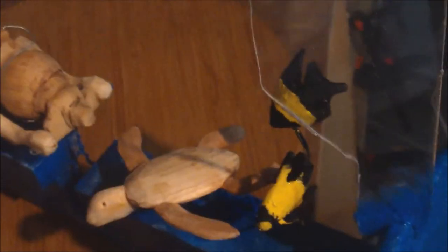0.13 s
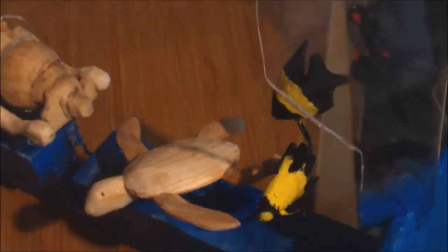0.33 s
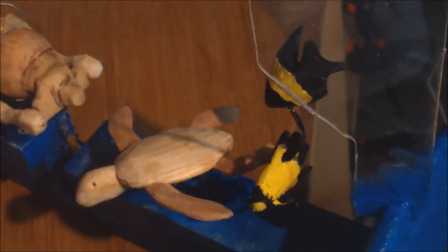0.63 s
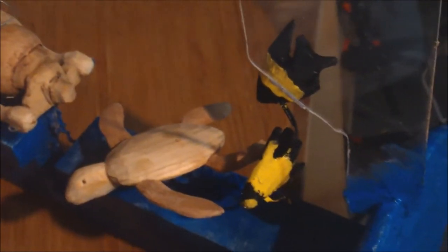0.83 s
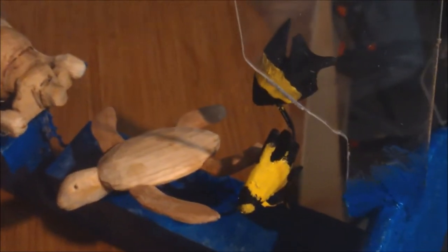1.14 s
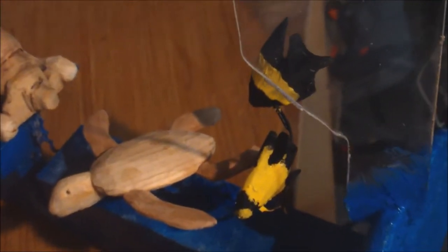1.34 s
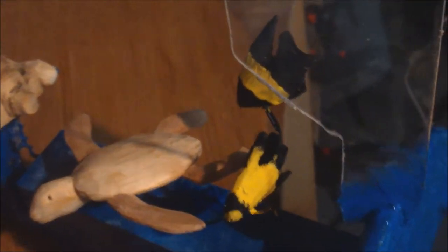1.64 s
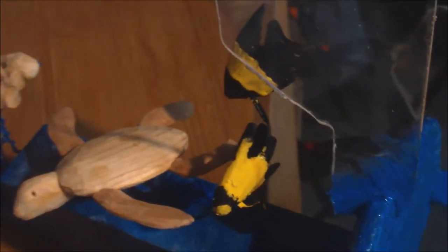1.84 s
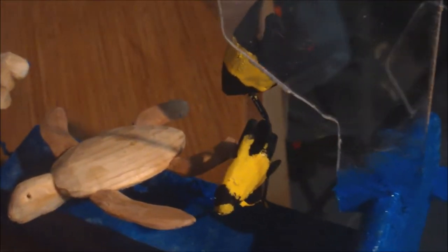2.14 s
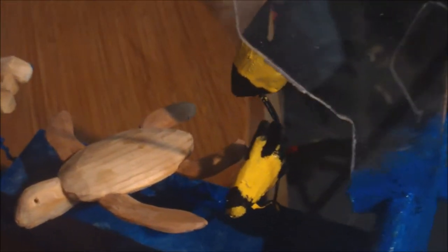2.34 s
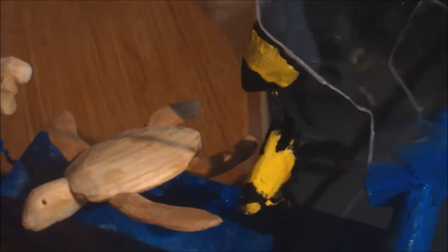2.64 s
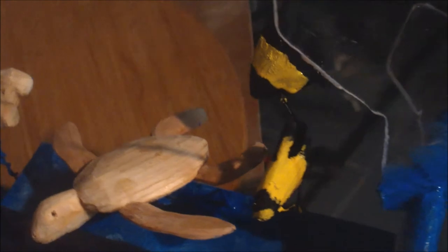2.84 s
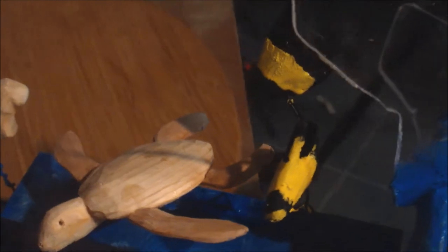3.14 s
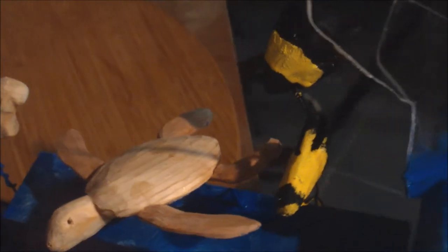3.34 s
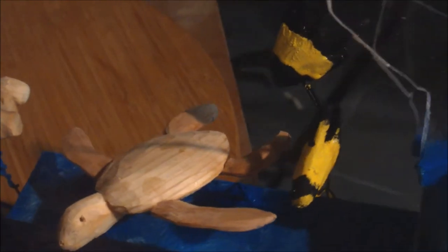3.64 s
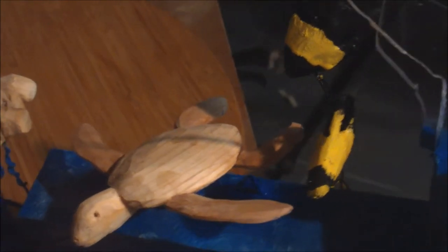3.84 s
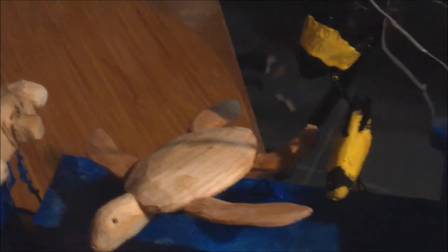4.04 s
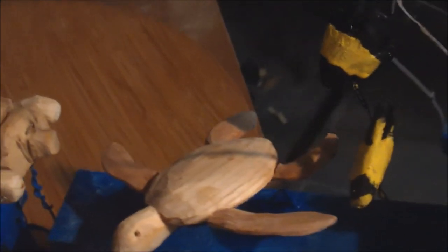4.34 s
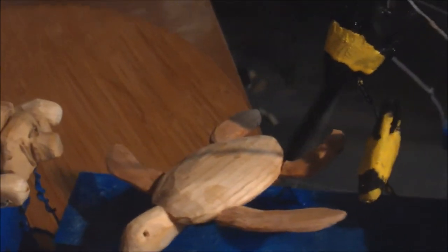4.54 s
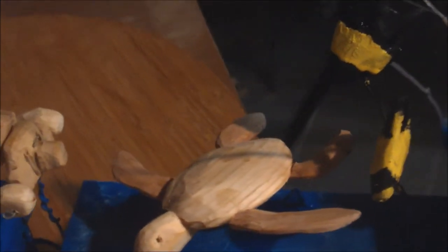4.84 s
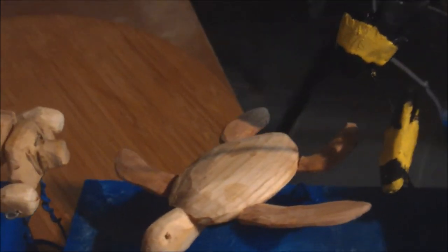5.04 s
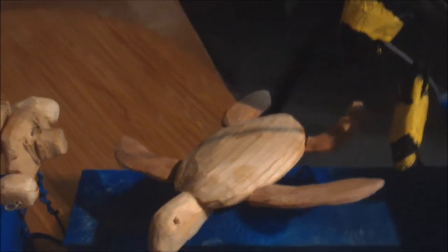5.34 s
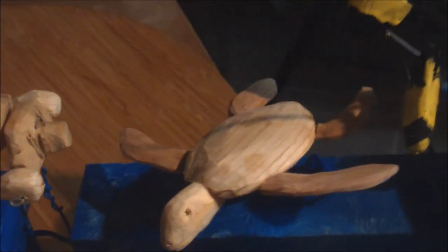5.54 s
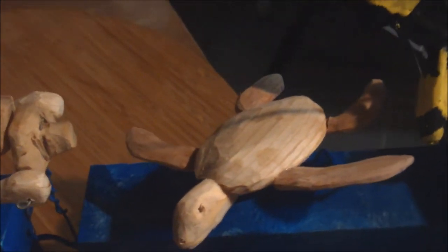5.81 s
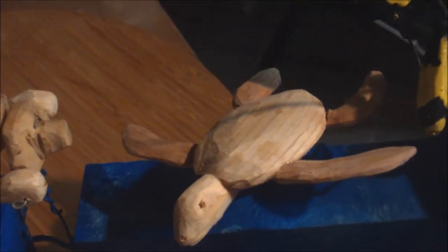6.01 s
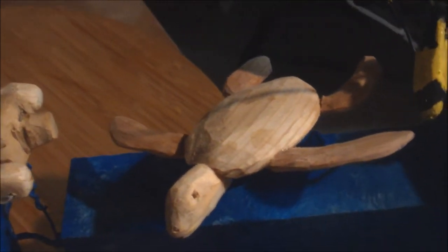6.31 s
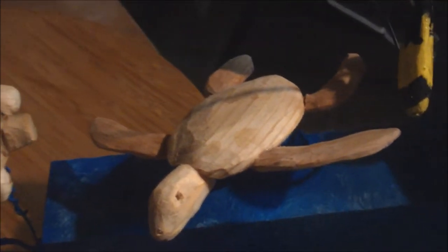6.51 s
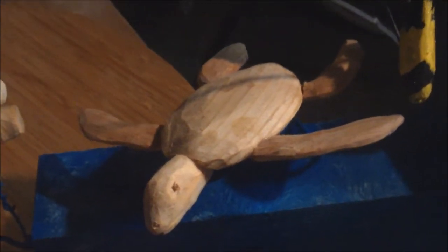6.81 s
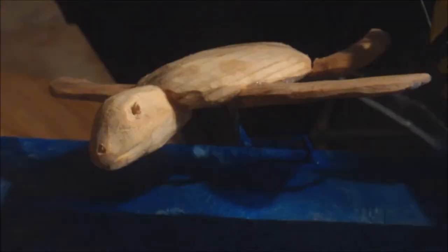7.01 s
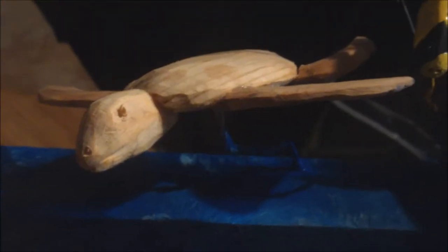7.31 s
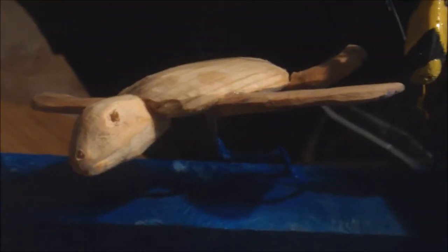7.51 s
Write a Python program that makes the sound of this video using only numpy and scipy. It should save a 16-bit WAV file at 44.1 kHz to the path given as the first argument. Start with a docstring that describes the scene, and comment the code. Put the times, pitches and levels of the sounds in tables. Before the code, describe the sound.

Irregular dull knocks, creaks and tiny sharp lens clicks beside a wooden toy, over a steady whining motor, low hum and hiss.

```python
"""At a wooden toy, a hand-held camera close to it hears mostly itself, through one microphone on its body.
A small motor whines as harmonics of its gear tooth rate, over coloured-noise hiss and rumble and a mains hum.
The lens drive ticks in short groups and sings on long moves: snaps ring barrel modes, step rates give tones.
Knocks, finger rustle and creaks under the grip ring the casing modes.
After a faint scrap and a near-silent gap, a splice brings the full sound in with a pop."""
import sys
import numpy as np
from scipy import signal
from scipy.fft import rfft, irfft
from scipy.io import wavfile
from scipy.ndimage import uniform_filter1d

SR = 44100
rng = np.random.default_rng(int(sys.argv[2]) if len(sys.argv) > 2 else 0)


def master_out(mix):
    """Clip the mix to full scale and print it as 16-bit PCM to the path in sys.argv[1]."""
    frames = np.transpose(np.atleast_2d(mix))
    ceiling = np.clip(frames, -1, 1)
    pcm = np.round(ceiling * 32767).astype(np.int16)
    wavfile.write(sys.argv[1], SR, pcm)


N = 337982
T = np.arange(N) / SR
FRAME_S = 1 / 29.97  # the lens drive acts once per picture frame
FIRST_TOUCH, TOUCH_LEAD_MS = 0.083, 0.7  # parts graze, at this share of the strike, just before they strike


def undb(db):
    """Decibels to amplitude."""
    return 10 ** (np.asarray(db) / 20)


def curve(table):
    """Straight lines between the (start_s, value) points of a table."""
    s, value = np.transpose(table)
    return np.interp(T, s, value)


def unit(x):
    """Scale to an rms of 1."""
    return x / np.sqrt(np.mean(x ** 2))


def walk(rate):
    """Random levels held 1 / rate s and slewed twice; spread 1."""
    k = int(SR / rate)
    held = np.repeat(rng.standard_normal(N // k + 1), k)
    return unit(uniform_filter1d(uniform_filter1d(held, k), k)[:N])


def ring(hz, t60, size=4500):
    """One decaying mode, 60 dB down after t60 seconds."""
    t = np.arange(size) / SR
    return np.sin(2 * np.pi * hz * t) * np.exp(-np.log(1000) * t / t60)


def gate(length, edge=0.001):
    """Time axis and a flat envelope with short ramps, in seconds."""
    t = np.arange(int(length * SR)) / SR
    return t, np.clip(np.minimum(t, length - t) / edge, 0, 1)


def lowpass(x, order, hz):
    """Butterworth low-pass."""
    return signal.lfilter(*signal.butter(order, hz, fs=SR), x)


def add(out, s, x):
    """Mix a sound in at time s."""
    i = int(s * SR)
    out[i:i + len(x)] += x[:max(N - i, 0)]


# colour of the background at the microphone: pitch_hz [Hz], level_db [dB per Hz, relative]
FLOOR_COLOUR = [(8, 7), (30, 0), (60, -10.5), (104, -16.5), (250, -19), (555, -27), (800, -27),
                (1300, -28.5), (1700, -31), (2300, -29.5), (3200, -30.5), (4400, -30.5), (5100, -30),
                (5800, -28.5), (6400, -31), (7000, -35.5), (8000, -55)]
FLOOR_DB = -28  # rms, before the splice gain


def floor():
    """Hiss and rumble: coloured noise in octave bands that each flicker in level."""
    hz = np.maximum(np.fft.rfftfreq(N, 1 / SR), 1)
    colour_hz, colour_db = np.transpose(FLOOR_COLOUR)
    colour = undb(np.interp(np.log(hz), np.log(colour_hz), colour_db))
    spectrum = rfft(rng.standard_normal(N)) * colour
    out = 0
    for octave in range(2, 15):
        share = np.clip(1 - np.abs(np.log2(hz) - octave), 0, 1)
        out = out + irfft(spectrum * share, N) * undb(2.0 * walk(22))
    return undb(FLOOR_DB) * unit(out)


HUM_HZ, HUM_DB = 60.9, -40.5  # dB rms, before the waver and the splice gain


def hum():
    """Mains hum: one low sine that wavers in level."""
    return np.sqrt(2) * undb(HUM_DB + 2.0 * walk(4.1)) * np.sin(2 * np.pi * HUM_HZ * T)


PILOT_HZ, PILOT_DB = 7854, -45  # dB rms, before the splice gain and the top filters


def pilot():
    """A thin steady tone at the top: one sine."""
    return np.sqrt(2) * undb(PILOT_DB) * np.sin(2 * np.pi * PILOT_HZ * T)


# gear tooth rate of the motor, before its waver: start_s [s], pitch_hz [Hz]
TOOTH_RATE = [(0, 677.6), (1, 676.7), (2.2, 677.8), (3.4, 677.1), (4.4, 676.8), (5.2, 677.9), (6.2, 676.9),
              (7.66, 677.8)]
# whine partials: multiple [of the tooth rate], level_db [dB rms, before waver and splice gain]
WHINE_PARTIALS = [(1, -43), (2, -51), (3, -44), (4, -53), (5, -54.5), (6, -45.5), (7, -41.5), (8, -42.5),
                  (9, -51), (10, -59)]


def whine():
    """Motor whine: harmonics of the gear tooth rate; speed and each partial waver a little."""
    tooth_hz = curve(TOOTH_RATE) + 0.41 * walk(4) + 1.634 * walk(70)
    phase = 2 * np.pi * np.cumsum(tooth_hz) / SR
    out = 0
    for multiple, db in WHINE_PARTIALS:
        level = undb(db + 0.7 * walk(25))
        out = out + level * np.sin(multiple * phase + 2 * np.pi * rng.random())
    return np.sqrt(2) * out


# modes of the casing around the microphone: pitch_hz [Hz], level_db [dB], t60_s [s]
# those above 900 Hz follow the hardness, those below 200 Hz the thump
CASING_MODES = [(103, -0.5, 0.032), (155, 0, 0.044), (272, -5.5, 0.091), (333, -1.5, 0.061),
                (460, -6.5, 0.057), (540, -2, 0.043), (633, 4, 0.03), (794, -4.5, 0.053), (905, -10, 0.021),
                (1040, 2.5, 0.026), (1206, 0, 0.025), (1373, 3.5, 0.026), (1330, -16, 0.0066)]
FAVOUR_DB, FAVOUR_OCTAVES = 8.5, 0.17  # modes near the strongest ring stand out


def casing(chance, hard_db, thump_db, strongest_hz, spread):
    """The casing's ring for one blow; every blow lands elsewhere and shifts the modes a little."""
    x = 0
    for (hz, db, t60), gain, drift in zip(CASING_MODES, chance, chance[len(CASING_MODES):]):
        share_db = hard_db if hz > 900 else thump_db if hz < 200 else 0
        share_db += FAVOUR_DB * np.exp(-(np.log2(hz / strongest_hz) / FAVOUR_OCTAVES) ** 2)
        swing = -1 if 1100 < hz < 1250 else 1  # one mode swings against its neighbours
        level = undb(db + share_db + 2 * spread * gain)
        x = x + swing * level * ring(hz * (1 + spread * drift / 50), t60)
    return x


# finger rustle on the casing: start_s [s], level_db [dB, before the splice gain]
RUSTLE_LEVEL = [(0.07, -28), (0.24, -31), (0.49, -37), (1.0, -38), (1.6, -32), (2.0, -38.5), (3.39, -42),
                (3.94, -45.5), (4.19, -41), (4.5, -42), (4.62, -39), (4.78, -43), (5.27, -47.5),
                (6.26, -44.5), (7.3, -56), (7.66, -43)]


def rustle(count=350):
    """Small finger slips in clusters, mostly faint; each stretch of casing rings its own way."""
    out = 0
    for chance in rng.standard_normal((5, 2 * len(CASING_MODES))):
        slips = np.zeros(N)
        strength = undb(0.76 * rng.exponential(size=count))
        slips[rng.integers(0, N, count)] = rng.choice([-1, 1], count) * strength
        clustered = lowpass(slips * undb(5.9 * walk(14)), 2, 600)
        out = out + signal.fftconvolve(clustered, casing(chance, -21.5, 0.55, 468, 3.03))[:N]
    return undb(curve(RUSTLE_LEVEL)) * unit(out)


# creaks of the casing under the grip:
# start_s [s], length_s [s], level_db [dB rms over the length], pitch_hz [Hz of the strongest ring]
GRIP_CREAKS = [(0.809, 0.034, -30, 520), (0.843, 0.023, -32.5, 500), (0.897, 0.027, -33.5, 560),
               (0.952, .035, -32, 640), (1.022, 0.028, -32.5, 520), (1.247, 0.04, -28, 500),
               (1.38, 0.024, -25, 533), (1.895, 0.027, -30, 550), (2.443, 0.026, -26.5, 523),
               (2.299, .03, -28.5, 490), (3.536, 0.04, -31, 324), (4.083, 0.015, -26, 317)]
CREAK_SLIPS_PER_S, CREAK_HARD_DB, CREAK_THUMP_DB = 1300, 2.5, -12
CREAK_WIDTH = 0.3  # width of the slips' band as a share of the strongest ring


def creaks():
    """Stick-slip bursts that swell and fade ring the casing."""
    out = np.zeros(N)
    chances = rng.standard_normal((len(GRIP_CREAKS), 2 * len(CASING_MODES)))
    for (s, length, db, hz), chance in zip(GRIP_CREAKS, chances):
        t, on = gate(length, length / 3)
        when, strength = rng.random((2, len(t)))
        slips = on * (when < CREAK_SLIPS_PER_S / SR) * (2 * strength - 1)
        band = signal.lfilter(*signal.iirpeak(hz, 1 / CREAK_WIDTH, fs=SR), 8 * slips)
        x = signal.fftconvolve(0.3 * slips + band, casing(chance, CREAK_HARD_DB, CREAK_THUMP_DB, hz, 0.68))
        add(out, s, undb(db) * x / np.sqrt(np.mean(x[:len(t)] ** 2) + 1e-18))
    return out


# knocks on the casing: start_s [s], level_db [dB rms of the loudest 7 ms], hardness_db [dB],
# build_up_ms [ms], pitch_hz [Hz of the strongest ring]
CASING_KNOCKS = [(0.1493, -6.5, 6, 5.9, 460), (0.328, -23, -14, 5.6, 450), (0.4346, -10.5, -3.5, 8.9, 264),
                 (0.509, -17.5, 2, 10, 484), (0.683, -17, 0, 7.5, 460), (0.886, -28, -20, 14, 140),
                 (1.142, -13, 1.5, 9, 495), (1.206, -27, -1, 30, 470), (1.164, -22, -18, 6.1, 480),
                 (1.283, -18, 4, 10, 530), (1.35, -12, 4.5, 7.5, 261), (1.464, -17.5, -4, 7, 264),
                 (1.531, -8, 1, 5.2, 264), (1.549, -18, -14.5, 5.1, 400), (1.618, -5.5, 2, 7.4, 266),
                 (1.637, -21, -29, 3.5, 460), (1.7379, 0.5, 2.5, 0.77, 500), (1.756, -20.5, -14, 7.6, 300),
                 (1.799, -28, -13, 4.5, 420), (1.83, -12.5, -2.5, 2.8, 264), (1.844, -19.5, -5, 11.5, 465),
                 (2.078, -29, -6, 2, 533), (2.2068, -9.5, -0.5, 5.9, 264), (2.296, -18.5, -1.5, 9.1, 258),
                 (2.321, -22, 3, 4.6, 480), (2.391, -35, 1, 4, 463), (2.553, -32, -12, 4.4, 513),
                 (2.643, -30.5, -4, 3.7, 520), (2.73, -29, -9, 4, 620), (2.772, -32.5, -18, 12, 476),
                 (2.814, -28, -12, 6, 520), (2.868, -29, -18, 4.5, 514), (2.919, -26, 0, 4.7, 460),
                 (3.023, -21, 2, 9.5, 230), (3.131, -16.5, -4.5, 12, 450), (3.15, -22.5, -5, 4, 450),
                 (3.225, -25, -8, 6.5, 482), (3.257, -32, -6, 6, 270), (3.416, -24.5, -7, 5.6, 200),
                 (3.71, -18.5, -11, 1.4, 660), (3.9369, -20.5, -3, 12.4, 328), (3.949, -19, 3, 4, 460),
                 (3.965, -25.5, -24, 11, 330), (4.042, -29, -15, 4.8, 500), (4.191, -28.5, 1, 18, 394),
                 (4.272, -21, 0, 11, 405), (4.4967, -12.5, -11, 7.3, 480), (4.512, -27.5, -23, 7.3, 270),
                 (4.723, -25, -8, 6.6, 528), (4.907, -27.5, -8, 8.3, 522), (4.954, -33, -15, 12, 560),
                 (5.09, -33, -14, 5, 535), (5.618, -27.5, -26, 9.2, 320), (5.861, -27.5, -2, 11.5, 600),
                 (7.4535, -32, -8, 4.6, 610), (7.463, -10.5, -7, 5.6, 615)]
THUMP_DB, THUMP_PER_HARD_DB = -1.5, 0.5  # soft blows stir the low modes less too
THUD_AFTER_S, THUD_HARD_DB, THUD_HZ = 0.014, -16.5, 580  # casing thud of a focus move
CASING_TOP_HZ = 1570  # the casing passes little above this


def knocks():
    """A graze and a first blow, longer when soft, then a scatter of duller bounces, ring the casing."""
    out = np.zeros(N)
    t = np.arange(1500) / SR

    def push(after, hard_db):
        softness = undb(-0.4 * min(hard_db, 0))
        return np.maximum(t - after, 0) * np.exp(-(t - after) / (0.000074 * softness))

    thuds = [(row[0] + THUD_AFTER_S, row[9], THUD_HARD_DB, 7.5, THUD_HZ) for row in FOCUS_MOVES]
    rows = CASING_KNOCKS + thuds
    chances = rng.standard_normal((len(rows), 2 * len(CASING_MODES) + len(t)))
    for (s, db, hard_db, ms, hz), chance in zip(rows, chances):
        scatter = 0.1 * chance[-len(t):] * (t * 1000 / ms) * np.exp(-t * 1000 / (0.6 * ms))
        bounces = lowpass(scatter, 2, 600)
        strike = FIRST_TOUCH * push(0, hard_db) + push(TOUCH_LEAD_MS / 1000, hard_db)
        blows = bounces - np.exp(-ms / 14) * strike / strike.sum()
        x = signal.fftconvolve(blows, casing(chance, hard_db, THUMP_DB + THUMP_PER_HARD_DB * hard_db, hz, 1.0))
        x = lowpass(x, 3, CASING_TOP_HZ)
        add(out, s, undb(db) * x / np.sqrt(uniform_filter1d(x ** 2, size=300).max()))
    return out


# modes of the lens carriage: pitch_hz [Hz], level_db [dB], t60_s [s]
# those above 400 Hz follow the brightness
CARRIAGE_MODES = [(274.7, 0.5, 0.091), (372, -1.5, 0.095), (445, -8, 0.08), (619, 6, 0.013),
                  (688, -10.5, 0.051), (824, -5.5, 0.02), (1060, -11, 0.025), (1336, -11.5, 0.042),
                  (1560, -28, 0.022)]
GRIND_S, GRIND_BRIGHT_DB = 0.028, 2
GRIND_OVER_DRIVE_DB = 8.5  # rumble of the carriage over the level of the burst that moves it


def grind():
    """Each zoom burst drags the carriage along its rail: gritty pushes into the carriage modes."""
    pushes = np.zeros(N)
    t, on = gate(GRIND_S, 0.0047)
    moves = [(row[0], row[1], row[3]) for row in FAST_ZOOMS] + SLOW_ZOOMS
    for s, frames, db in moves:
        for k in range(round(frames)):
            add(pushes, s + k * FRAME_S, undb(db) * on * rng.standard_normal(len(t)))
    body = 0
    for k, (hz, db, t60) in enumerate(CARRIAGE_MODES):
        level = undb(db + (GRIND_BRIGHT_DB if hz > 400 else 0))
        body = body + (-1) ** k * level * ring(hz, t60)
    body = body / np.sqrt(np.sum(body ** 2))
    return undb(GRIND_OVER_DRIVE_DB) * signal.fftconvolve(pushes, body)[:N]


# jolts of the lens carriage while it travels, each with a tick of the barrel:
# start_s [s], level_db [dB, relative], tick_db [dB peak]
CARRIAGE_JOLTS = [(0.0717, -25, -18), (0.0862, -13, -10.5), (0.104, -22, -22), (0.1182, -14.5, -10.5),
                  (.132, -34, -21), (0.1514, -16, -8), (0.1737, -19, -22), (0.1852, -15.5, -13.5),
                  (0.194, -38, -32), (0.207, -40, -26), (0.22, -10, -11), (0.229, -24, -19),
                  (0.25, -33, -12.5), (0.2579, -16, -9), (0.524, -28, -31), (.536, -31, -23),
                  (.547, -34, -27), (0.558, -23, -8), (0.579, -30, -25), (0.5912, -24.5, -16.5),
                  (.625, -31, -26), (0.6461, -23, -15), (0.6604, -20, -19), (7.163, -25, -8),
                  (7.196, -18.5, -13.5), (7.235, -36, -12.5), (7.27, -41, -32), (7.493, -19, -11),
                  (7.505, -28, -14), (7.5266, -21, -10), (7.539, -47, -15), (7.5599, -19, -8),
                  (7.573, -37, -11.5), (7.5932, -18, -7), (7.607, -21, -11), (7.6265, -10.5, -7.5),
                  (7.637, -17.5, -5.5), (7.658, -20, -10)]
DULL_JOLT_DB, BRIGHT_PER_TICK_DB = -2, 0.6829  # the louder the tick over its jolt, the brighter the jolt
CHATTER, CHATTER_S, CHATTER_HZ = 0.061, 0.0049, 447  # the carriage chatters on, above this pitch
JOLT_BUILD_S, JOLT_PUSH_MS = 0.0023, 0.41  # the carriage strains, then gives with a short push


def jolts():
    """The carriage strains, gives with a push, then chatters; its modes swing opposite ways in pairs."""
    out = np.zeros(N)
    t = np.arange(-400, 1000) / SR
    strain = CHATTER * np.where(t < 0, np.exp(t / JOLT_BUILD_S), np.exp(-t / CHATTER_S))
    soft_push = np.exp(-(t * 1000 / JOLT_PUSH_MS) ** 2)
    chances = rng.standard_normal((len(CARRIAGE_JOLTS), len(CARRIAGE_MODES) + len(t)))
    for (s, db, tick_db), chance in zip(CARRIAGE_JOLTS, chances):
        bright_db = DULL_JOLT_DB + BRIGHT_PER_TICK_DB * (tick_db - db)
        body = 0
        for k, ((hz, mode_db, t60), gain) in enumerate(zip(CARRIAGE_MODES, chance)):
            level = undb(mode_db + (bright_db if hz > 400 else 0) + 1.4 * gain)
            body = body + (-1) ** ((k + 1) // 2) * level * ring(hz, t60)
        chatter = signal.lfilter(*signal.butter(2, CHATTER_HZ, "highpass", fs=SR), strain * chance[-len(t):])
        pushes = chatter + soft_push / soft_push.sum()
        add(out, s + t[0], undb(db) * signal.fftconvolve(body, pushes))
    return out


# slow zoom moves, one burst a frame: start_s [s], frames [count], level_db [dB, relative]
SLOW_ZOOMS = [(0.31, 2, -44), (.377, 1, -43), (.573, 2, -39), (0.641, 1, -37), (7.185, 3, -37)]
# harmonics of the slow steps: multiple [of the step rate], level_db [dB]
NUDGE_HARMONICS = [(1, -3), (2, 6), (3, -9.5), (5, -4)]
NUDGE_HZ, NUDGE_S = 1259, 0.024  # step rate, length of a burst
NUDGE_GRIT, BUZZ_GRIT = 2.2, 2.2  # gear hiss against the harmonics, in zoom and focus moves
BUZZ_AFTER_S, BUZZ_FADE_S = 0.001023, 0.008


def nudges():
    """Slow steps buzz on harmonics of the step rate: held in zoom moves, dying at once in focus moves."""
    out = np.zeros(N)
    t, held = gate(NUDGE_S, 0.0029)
    dying = np.minimum(t / 0.0025, 1) * np.exp(-t / BUZZ_FADE_S)
    bursts = [(s + k * FRAME_S, held, db, NUDGE_GRIT)
              for s, frames, db in SLOW_ZOOMS for k in range(round(frames))]
    bursts += [(row[0] + BUZZ_AFTER_S, dying, row[8], BUZZ_GRIT) for row in FOCUS_MOVES]
    tone = sum(undb(db) * np.sin(2 * np.pi * k * NUDGE_HZ * t + k) for k, db in NUDGE_HARMONICS)
    gears = signal.butter(2, [1900, 4500], "bandpass", fs=SR)
    for s, on, db, grit in bursts:
        gear_hiss = signal.lfilter(*gears, rng.standard_normal(len(t)))
        add(out, s, undb(db) * on * (tone + grit * gear_hiss))
    return out * undb(2.5 * walk(200))  # the buzz is uneven


# fast zoom moves, one burst a frame: start_s [s], frames [count], pitch_hz [Hz, step rate],
# level_db [dB, relative], octave_db [dB share of the octave], roughness [0-1]
FAST_ZOOMS = [(0.0708, 5, 3053, -34, 8, 0.1), (.237, 1, 3850, -31.5, -21, 0.86),
              (.545, 1, 2970, -37, 7, 0.4), (7.152, 1, 2990, -33, 4.5, 0.2),
              (7.452, 1, 2526, -31, -20, 0.5), (7.4866, 4, 3210, -32, -12, 0.6),
              (7.62, 2, 3080, -29.5, 3, 0.34)]
DRIVE_S = 0.023  # length of a burst


def drives():
    """Fast steps sing their rate and its octave, broken up as the gears slip, with gear hiss."""
    out = np.zeros(N)
    t, on = gate(DRIVE_S, 0.0018)

    def waver():
        return uniform_filter1d(rng.standard_normal(len(t)), size=90) * 9.5  # spread 1

    for s, frames, hz, db, octave_db, rough in FAST_ZOOMS:
        for k in range(round(frames)):
            phase = 2 * np.pi * np.cumsum(hz * (1 + 0.03 * rough * waver())) / SR
            tone = undb(5 * waver()) * np.sin(phase)
            octave = undb(octave_db + 6 * rough * waver()) * np.sin(2 * phase)
            gear_hiss = (0.8 + rough) * rng.standard_normal(len(t))
            add(out, s + k * FRAME_S, undb(db) * on * (tone + octave + gear_hiss))
    return out


# lone lens ticks where a long move starts or ends:
# start_s [s], level_db [dB peak], treble_db [dB share], pitch_hz [Hz of the strongest ring]
LONE_TICKS = [(0.243, -17, -4, 3740), (0.2643, -16, -8, 2920), (0.4061, -8, 14, 3140),
              (0.6738, -7.5, 23, 2550), (7.1511, -5, 4, 2940), (7.174, -9.5, 4, 3000),
              (7.2848, -16.5, 23, 2556), (7.4641, -8, 2, 2340)]
# focus moves, one frame long: start_s [s], start_tick_db [dB peak], start_pitch_hz [Hz],
# slip_after_ms [ms], slip_tick_db [dB peak], stop_tick_db [dB peak], stop_pitch_hz [Hz],
# stop_treble_db [dB share], buzz_db [dB, relative], casing_thud_db [dB rms of the loudest 7 ms]
FOCUS_MOVES = [(2.0082, -10.5, 3280, 13.7, -8.5, -7.5, 2480, 9.5, -29, -24.5),
               (2.241, -12, 2540, 6, -23, -7.5, 3030, 2.5, -35, -32),
               (2.709, -9, 2900, 26, -19, -7, 2550, 18, -26, -26.5),
               (3.1753, -11.5, 2580, 16, -13, -5.5, 2550, 10, -29, -20),
               (3.6423, -7.5, 2830, 15, -20, -10, 2550, 12, -23, -30),
               (4.11, -9.5, 2550, 16.7, -12, -9, 3000, 3, -24, -21.5),
               (4.343, -7, 2870, 16, -21, -2.5, 3020, 3, -36, -24),
               (4.576, -1.5, 2980, 20, -25, -16, 2960, -8, -32, -23),
               (4.8103, -12, 2980, 9.1, -12.5, -8.5, 2600, 5, -41, -26.5),
               (5.2792, -6, 2580, 15.3, -10.5, -9.5, 2320, 10, -26, -25.5),
               (5.7458, -11, 2550, 18.5, -13, -7.5, 2500, 10, -26, -21),
               (5.9786, -9.5, 2930, 9, -18, -5, 2960, 4, -36, -33),
               (6.4445, -6.5, 3000, 20, -10, -5, 2940, 4, -23.5, -26.5),
               (6.6782, -5.5, 3100, 6.3, -15, -6.5, 3020, 4, -47, -45),
               (6.9115, -8.5, 3100, 5.3, -13.5, -7, 2580, 19, -45, -32.5)]
# slow steps as a move gathers speed: start_s [s], length_s [s], steps_per_s [1/s], level_db [dB peak]
SLOW_STEPS = [(0.533, .027, 285, -18.5)]
START_TREBLE_DB, SLIP_TREBLE_DB, SLIP_HZ = 1.5, -19.5, 2980
RATCHET_HZ, RATCHET_TREBLE_DB = 2330, 7
JOLT_TICK_HZ, JOLT_TICK_SPREAD_HZ, JOLT_TREBLE_DB = 2970, 130, 7
SHAKE_PER_KNOCK_DB, SHAKE_AFTER_S, SHAKE_HZ = 1.5, 0.0004, 2680  # a loud hard knock makes the lens tick


def tick_rows():
    """Every barrel tick as (s, dB, treble dB, Hz): lone, focus, slow steps, jolts, hard knocks."""
    rows = list(LONE_TICKS)
    for s, start_db, start_hz, slip_ms, slip_db, stop_db, stop_hz, treble_db, _, _ in FOCUS_MOVES:
        rows.append((s, start_db, START_TREBLE_DB, start_hz))
        rows.append((s + slip_ms / 1000, slip_db, SLIP_TREBLE_DB, SLIP_HZ))
        rows.append((s + FRAME_S, stop_db, treble_db, stop_hz))
    for s, length, rate, db in SLOW_STEPS:
        rows += [(step, db, RATCHET_TREBLE_DB, RATCHET_HZ) for step in np.arange(s, s + length, 1 / rate)]
    for (s, _, tick_db), chance in zip(CARRIAGE_JOLTS, rng.standard_normal(len(CARRIAGE_JOLTS))):
        rows.append((s, tick_db, JOLT_TREBLE_DB, JOLT_TICK_HZ + JOLT_TICK_SPREAD_HZ * chance))
    for s, db, hard_db, _, _ in CASING_KNOCKS:
        shake_db = SHAKE_PER_KNOCK_DB * db + hard_db
        if shake_db > -24:  # fainter ones drown in the hiss
            rows.append((s + SHAKE_AFTER_S, shake_db, 0, SHAKE_HZ, True))
    return rows


# modes of the lens barrel: pitch_hz [Hz], level_db [dB], t60_s [s]
# those above 3900 Hz follow the treble share
BARREL_MODES = [(1442, -7.5, 0.033), (1940, -37.5, 0.0013), (2470, -29.5, 0.0083), (3260, 12, 0.0032),
                (4130, -4.5, 0.0046), (4760, 1.5, 0.0051), (5400, -10.5, 0.0092), (5450, -13.5, 0.00098)]
TICK_RING_S, SHAKE_RING_S = 0.018, 0.004  # t60 of the strongest ring; a shaken lens hardly rings


def ticks():
    """A graze and a broadband snap ring the lens barrel, then a weak rebound and a gritty tail."""
    out = np.zeros(N)
    t = np.arange(600) / SR
    snap = signal.butter(2, [1000, 7000], "bandpass", fs=SR, output="sos")
    rows, lead, modes = tick_rows(), int(TOUCH_LEAD_MS * SR / 1000), len(BARREL_MODES)
    grit = 0.054 * np.exp(-np.abs(t * 1000 - TOUCH_LEAD_MS) / 0.14) + 0.021 * np.exp(-t / 0.017)
    chances = rng.standard_normal((len(rows), 2 * modes + 1 + len(t)))
    for (s, db, treble_db, strongest_hz, *shaken), chance in zip(rows, chances):
        x = ring(strongest_hz, SHAKE_RING_S if shaken else TICK_RING_S, size=1500)
        x[0] = 2.2  # the bare contact
        for (hz, mode_db, t60), gain, drift in zip(BARREL_MODES, chance, chance[modes:]):
            level = undb(mode_db + (treble_db if hz > 3900 else 0) + 1.0 * gain)
            x = x + level * ring(hz * (1 + 0.03 * drift), t60, size=1500)
        contact = chance[-len(t):] * grit
        contact[0], contact[lead] = FIRST_TOUCH, 1
        rebound_s = 0.0032 + 0.0008 * np.tanh(chance[2 * modes])
        contact[int(SR * rebound_s)] += 0.25
        x = signal.sosfilt(snap, signal.fftconvolve(x, contact))
        add(out, s, undb(db) * x / np.abs(x).max())
    return out


# level of the steady sources around the splice: start_s [s], level_db [dB gain]
SPLICE_LEVEL = [(0, -3.5), (.024, -18), (.034, -59), (.062, -38), (.066, 1), (8, 2)]
POP_S, POP_MS = 0.0667, 1.31  # start and length of the step at the splice


def scene():
    """All sources reach one microphone through the camera body; a brief full step at the splice makes the pop."""
    steady = (floor() + hum() + pilot() + whine() + rustle()) * undb(curve(SPLICE_LEVEL))
    pop = (T > POP_S) & (T < POP_S + POP_MS / 1000)
    handling = creaks() + knocks()
    lens = grind() + jolts() + nudges() + drives() + ticks()
    return (steady + pop + handling + lens)[None]


TOP_HZ = 6900


def record(dry):
    """The microphone input clips just under full scale and steep filters cut the top."""
    clipped = np.clip(dry, -0.9, 0.9)
    slope = signal.sosfilt(signal.cheby1(8, 1, TOP_HZ, fs=SR, output="sos"), clipped)
    return signal.sosfilt(signal.ellip(8, 0.2, 40, 8000, fs=SR, output="sos"), slope)


dry = scene()
out = record(dry)
master_out(out)
```